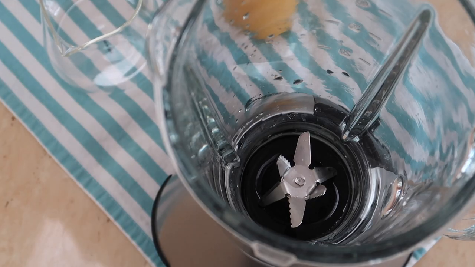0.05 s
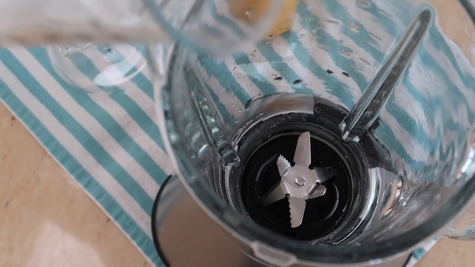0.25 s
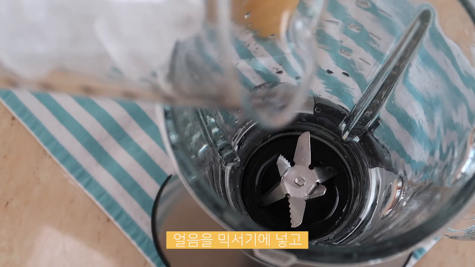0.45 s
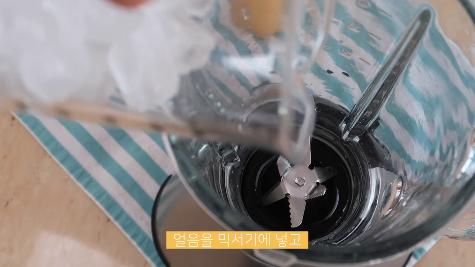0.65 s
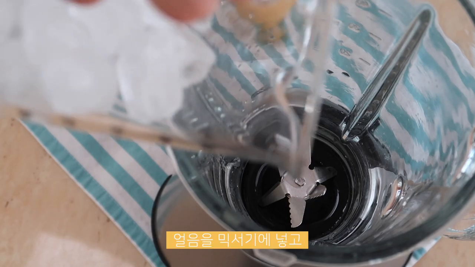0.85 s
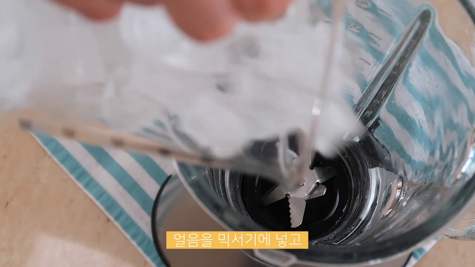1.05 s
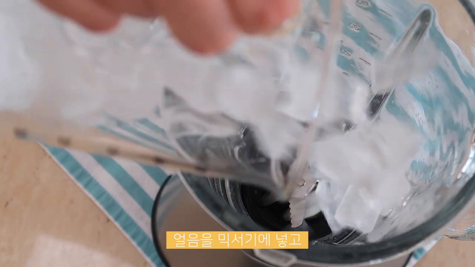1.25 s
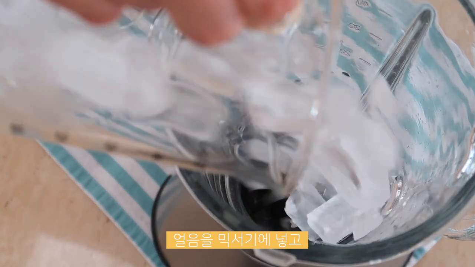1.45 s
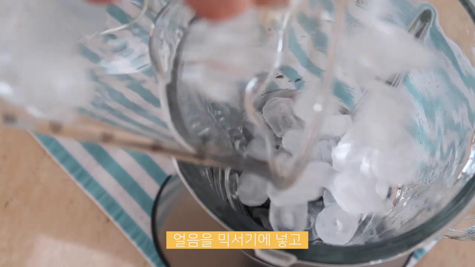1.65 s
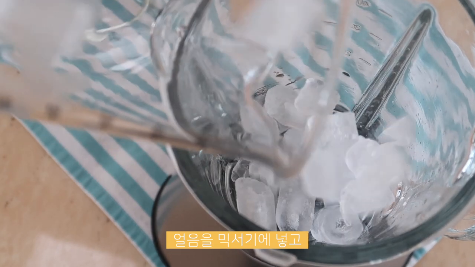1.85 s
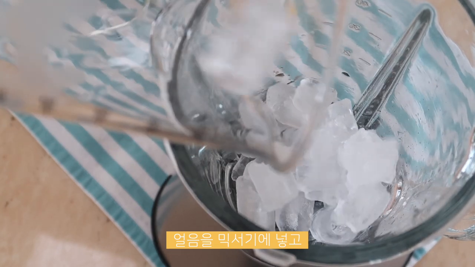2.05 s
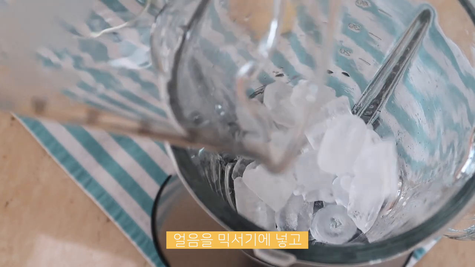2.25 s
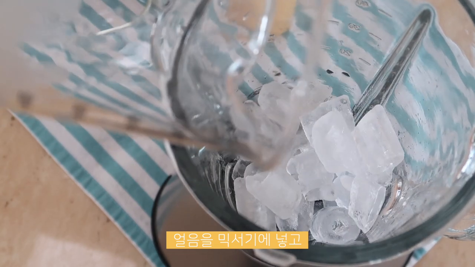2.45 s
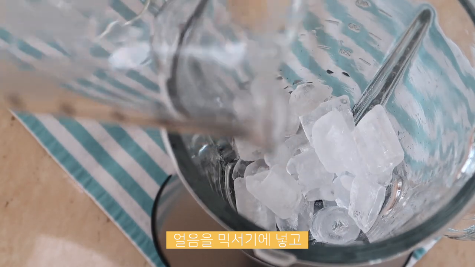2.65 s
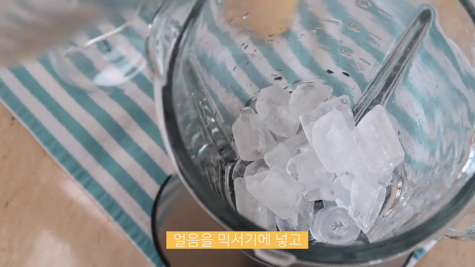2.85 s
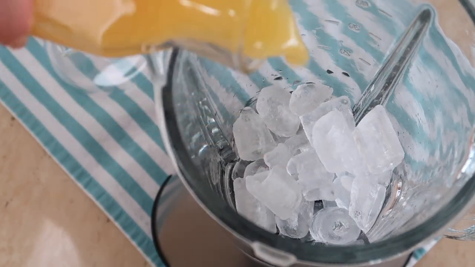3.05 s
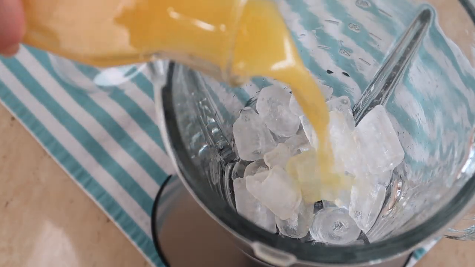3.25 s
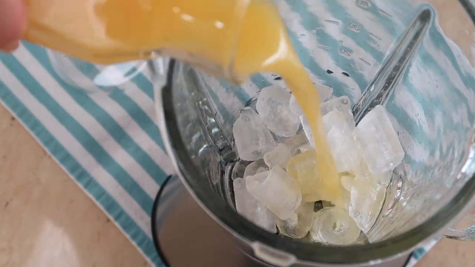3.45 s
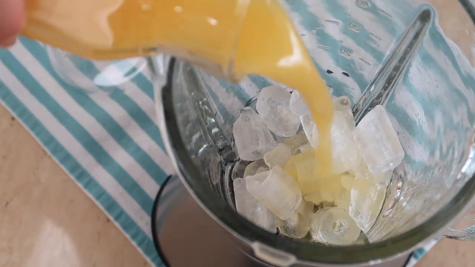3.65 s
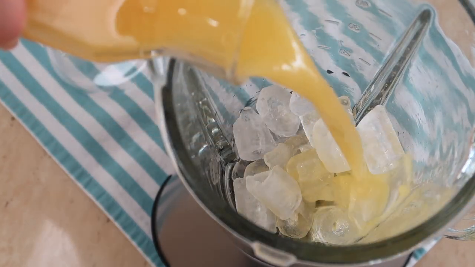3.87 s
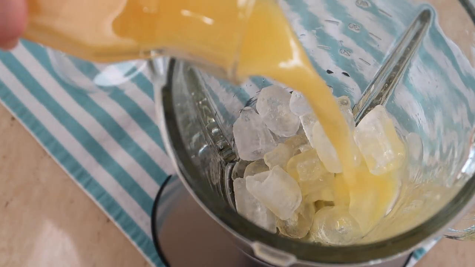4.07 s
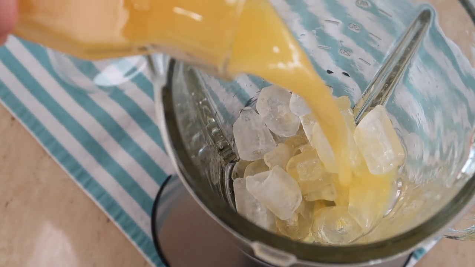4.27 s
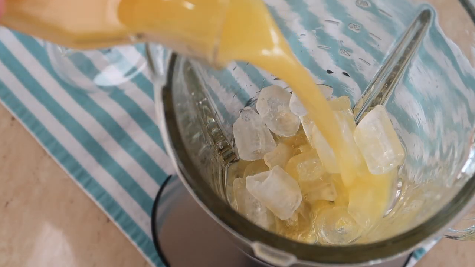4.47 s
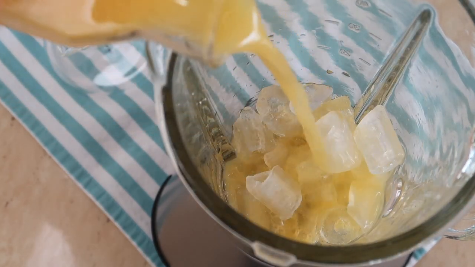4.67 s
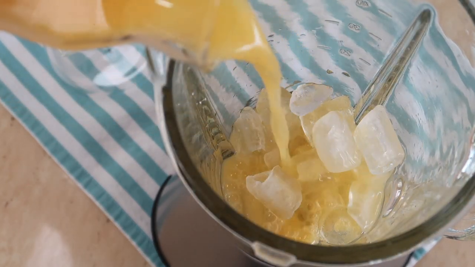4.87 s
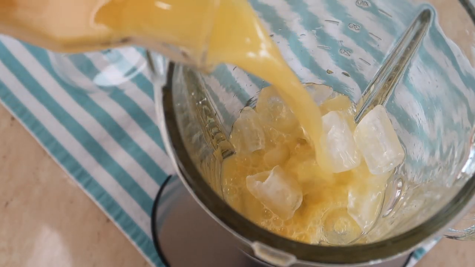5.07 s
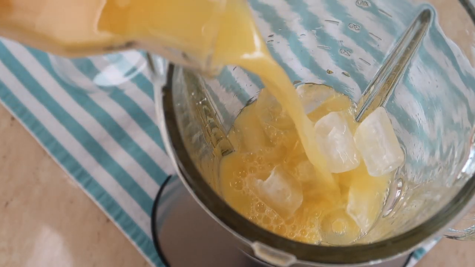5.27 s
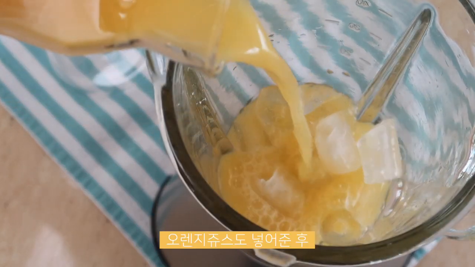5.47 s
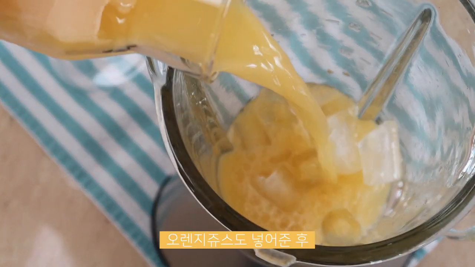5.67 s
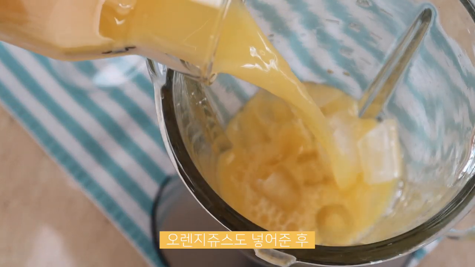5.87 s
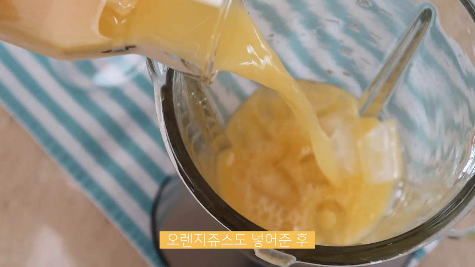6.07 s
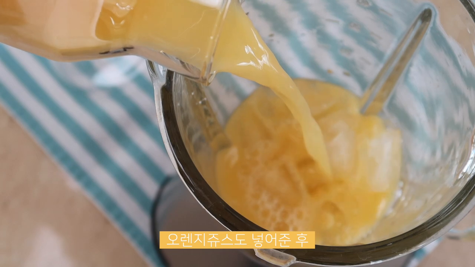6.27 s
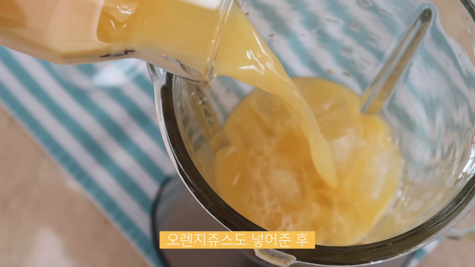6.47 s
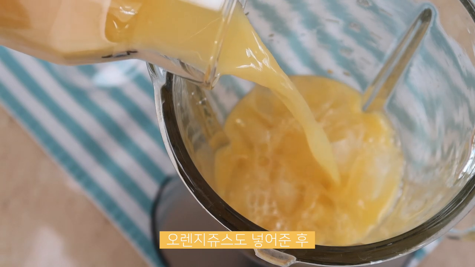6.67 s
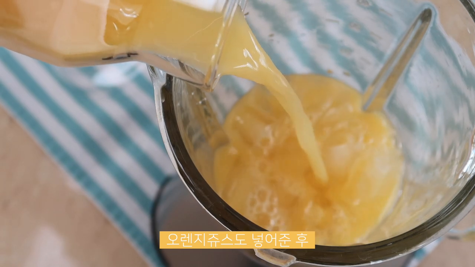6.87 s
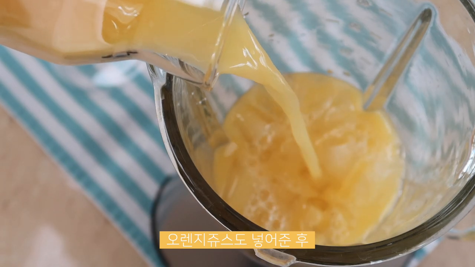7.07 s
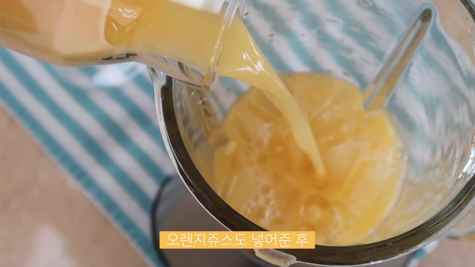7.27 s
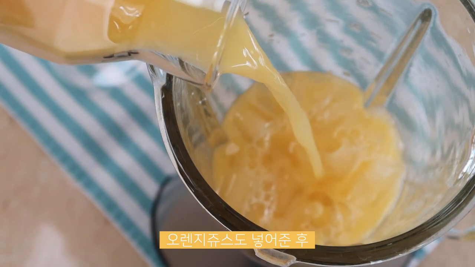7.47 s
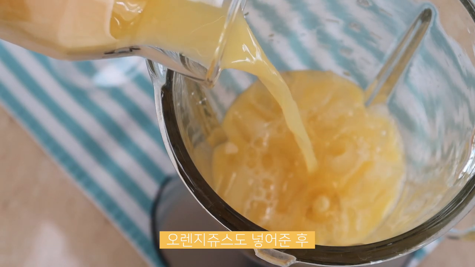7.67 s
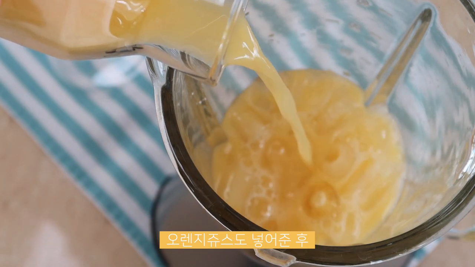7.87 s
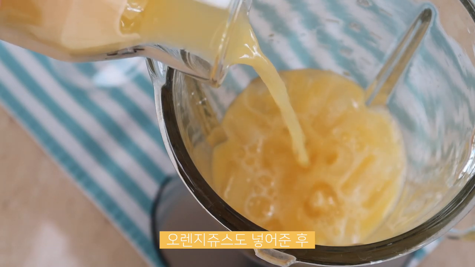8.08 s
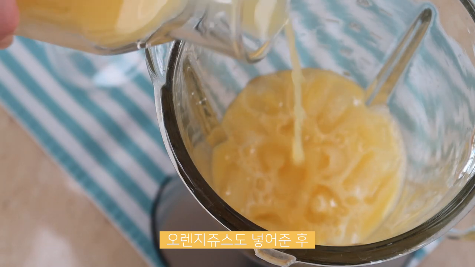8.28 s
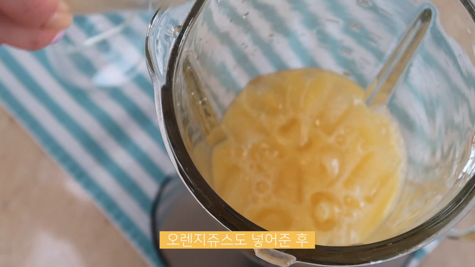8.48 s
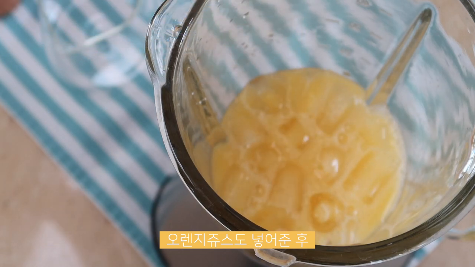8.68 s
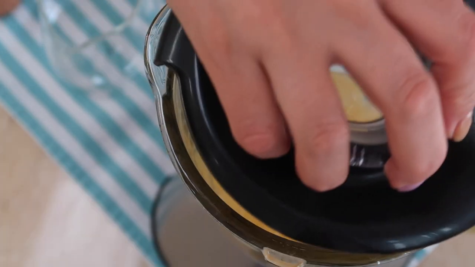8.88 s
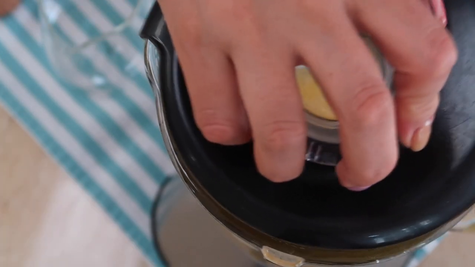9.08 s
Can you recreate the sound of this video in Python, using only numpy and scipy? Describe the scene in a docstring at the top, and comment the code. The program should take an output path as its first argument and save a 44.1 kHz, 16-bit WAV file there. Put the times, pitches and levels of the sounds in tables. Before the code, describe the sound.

Close up in a quiet, faintly humming kitchen, ice cubes shift with a few clicks in a tub, then tumble noisily into a glass jug, which rings dully. After a short lull, juice pours over the ice with bubbling, plinks and spatter, gradually softening. The bottle gurgles as it is tipped back, then a hollow plastic lid knocks onto the rim with a brief rasp.

```python
"""A small kitchen hums quietly while ice cubes slide out of a tub and tumble into a glass blender jug.
The jug rings like a dull bell: each mode of the glass is a dying sine. After a faint low hum, juice is poured,
with a dull knock on the jug as pouring starts and later a slump of ice. Many short rising tones make its bubbles,
noisy grains its spatter. The bottle gurgles in short hollow notes as it is tipped back.
Last, a plastic lid is knocked on as a set of short sines, and its seal rasps and groans along the rim."""
import sys
import numpy as np
from scipy import signal
from scipy.fft import rfft, irfft
from scipy.io import wavfile
from scipy.ndimage import uniform_filter1d

SR = 44100
rng = np.random.default_rng(int(sys.argv[2]) if len(sys.argv) > 2 else 0)


def wrap_up_sound(samples):
    """Save the sound to the file named by the first command line argument, as 16-bit audio."""
    columns = np.atleast_2d(samples).T
    # keep every value between -1 and 1, then stretch to whole-number steps
    tamed = np.clip(columns, -1, 1)
    steps = np.round(tamed * 32767).astype(np.int16)
    wavfile.write(sys.argv[1], SR, steps)


N = 402633  # length in samples

# All levels in the tables are relative: the functions weigh and mix them further.
# Colour of the room's air noise: pitch_hz, level_db_per_hz
ROOM_TONE = [(15, -35), (25, -16), (87, -8), (123, -14.5), (242, -11.5), (301, -15), (326, -25.5),
             (384, -15.5), (416, -24), (476, -15.5), (516, -18.5), (714, -20.5), (1330, -27.5),
             (10100, -49.5), (16000, -63.5)]
ROOM_DB = -56.5
# Hum of an appliance: pitch_hz, level_db, unsteadiness_per_s (two random phase points for each)
HUM = [(38.8, -63.5, 3.6), (82.2, -57.5, 5.1)]
# Colour of the air noise that differs between the ears: pitch_hz, level_db_per_hz
WIDTH_TONE = [(35, -58.5), (60, -28.5), (186, -1.5), (458, 0), (539, -6.5), (4020, -15), (4730, -18.5),
              (13700, -36.5), (15000, -44.5)]

# Cubes rumbling in the tub, shaken once and then tipped: time_s, rumble_db, note_db
TUMBLE = [(0.0, -60, -72), (0.08, -61, -55.5), (0.22, -46.5, -51), (0.245, -61, -47), (0.37, -55, -48),
          (0.48, -68, -71), (0.8, -73, -71), (0.87, -55, -58), (1.15, -50.5, -51), (1.3, -48, -57)]
# Colour of the tub's rumble: pitch_hz, level_db_per_hz
TUB = [(520, -9.5), (700, 0), (850, 1), (1200, -14), (1550, 0.5)]
TUB_HZ, TUB_T60, TUB_DB = 691, 0.15, -2  # the tub's hollow note; T60 is the time (s) to die by 60 dB

# How hard the heap of cubes is moving: time_s, level_db
HEAP = [(0.0, -68), (0.11, -69), (0.2, -54), (0.38, -50.5), (0.52, -73), (0.83, -66.5), (0.88, -52),
        (0.98, -41), (1.1, -34), (1.19, -38), (1.27, -24), (1.35, -32), (1.46, -29), (1.8, -31),
        (1.97, -37.5), (2.22, -47.5), (2.33, -38.5), (2.45, -53), (2.64, -74)]
# Colour of cubes jostling: pitch_hz, level_db_per_hz
ICE = [(1050, -1.5), (1400, -12.5), (1900, 2), (2300, -1.5), (2850, 4.5), (3400, -11.5), (4100, -9.5),
       (4900, -3.5), (5700, -18.5), (7000, -26.5)]
# Colour of knocks on the jug's base: pitch_hz, level_db_per_hz
BASE = [(250, -22), (350, -21.5), (430, -3.5), (560, -2.5), (700, -11), (850, -2.5), (1000, 11)]
# Colour of the ice splinters: pitch_hz, level_db_per_hz
GRIT = [(3240, -9), (5500, 1), (6400, -7.5), (6790, -8), (9740, -7.5), (10800, -13), (12700, -8),
        (16000, -39)]
GRIT_CYCLES = 180  # cycles for a splinter's ring to die by 60 dB
GRIT_DB, GRIT_AT_DB, GRIT_GROWTH = -37, -29, 1.37  # grit at this heap level; dB gained per dB of motion
SURGES_PER_S, SURGE_DB = 35, 2  # the heap slips and sticks
LANDING_S, LANDING_TAKES_S = 1.225, 0.099  # the heap begins to drop onto the glass
KNOCK_DB, SHIMMER_DB = -8, -5.5  # base and wall of the jug, relative to the landed heap

# Loudest clacks of cube on cube: start_s, level_db, pitch_hz, brittleness_db
CLACKS = [(0.131, -32, 1550, -12), (0.164, -25, 1980, 8), (0.169, -15.5, 2800, -7), (0.1955, -27, 2780, -1),
          (0.2304, -30.5, 3000, 14), (0.2425, -18, 2720, 4), (0.3476, -23, 2340, -2),
          (0.3556, -20, 2070, -6.5), (0.6855, -33.5, 2260, -18), (0.9073, -32, 2760, -6),
          (0.9477, -24.5, 2770, 9), (0.956, -26, 2400, 3.5), (0.9901, -24.5, 2760, -0.5),
          (1.0056, -28, 2920, -2), (1.0245, -22, 1990, 1), (1.0465, -17.5, 2750, -1),
          (1.0794, -19, 2900, 0), (1.0959, -18.5, 2750, 1.5), (1.1045, -17, 4960, 3),
          (1.1172, -20, 2080, 0.5), (1.1533, -22, 2790, 0), (1.1868, -18.5, 2980, -6),
          (1.2657, -2, 2290, -3), (1.2832, -11.5, 4900, -0.5), (1.291, -15.5, 4900, 9),
          (1.3085, -9.5, 2930, -1), (1.3163, -2, 2610, -10), (1.3227, -8, 1810, -5.5),
          (1.364, -12.5, 1800, 0.5), (1.4366, -12, 2800, -2.5), (1.5149, -17, 2530, 0.5),
          (1.5591, -1, 2740, -1.5), (1.5907, -13, 2100, 1.5), (1.601, -15.5, 2930, -3),
          (1.7288, -10, 4750, 9.5), (1.814, -12.5, 3210, -3), (1.9122, -8.5, 4960, 0.5),
          (1.933, -9, 2820, 5), (2.0238, -27, 2270, -2), (2.0947, -11, 2350, 6.5), (2.142, -10, 2820, -8),
          (2.2303, -38.5, 2480, -2), (2.3025, -8, 2564, 5), (2.4363, -30, 3910, -4)]
# Modes of a cube: multiple_of_pitch, level_db
CUBE = [(1, 0), (.8, -13.5), (1.37, -14), (1.72, -16.5)]

# Ice or bottle striking the jug:
# start_s, level_db, height (base 0 to wall 1), bell_db, longest_ring_s, favoured_hz
STRIKES = [(1.206, -32, 0.82, -27.5, 0.46, 2760), (1.238, -22.5, 0.77, -27, 0.38, 2500),
           (1.247, -24.5, 0.73, -20, 0.25, 3620), (1.266, -17.5, 0.37, -36, 0.18, 2300),
           (1.322, -31.5, 0.06, -28.5, 0.82, 420), (1.403, -27.5, 0.27, -27, 1, 4620),
           (1.452, -28, 0.42, -30, 0.34, 4720), (1.560, -34.5, 1, -42, 0.37, 2770),
           (1.648, -32.5, 0.93, -24, 0.16, 4720), (1.712, -28.5, 0.91, -31, 0.16, 4750),
           (1.77, -33, 1, -27.5, 1, 5030), (1.912, -34, 1, -25.5, 0.72, 5080),
           (2.057, -29.5, 0.81, -43, 0.51, 4820), (2.096, -27.5, 0.12, -20, 0.076, 3400),
           (2.255, -31.5, 0.78, -23, 0.51, 2490), (2.301, -31, 0.56, -26.5, 1, 3560),
           (3.252, -33, 0.017, -27.5, 0.29, 3556), (3.97, -30, 0.14, -29, 0.19, 2490)]
# Modes of the jug above or below its bell note: pitch_hz, level_db, t60_s
JUG = [(335, -10, .16), (421, 0, .22), (445, -5, .22), (490, -5, .27), (533, -9, .14), (829, -10, .15),
       (1023, -7, .36), (1115, -12, .25), (1206, -7, .09), (1325, -12, .2), (1544, -7, .25),
       (1809, -6, .35), (1955, -3, .36), (2299, -4, .38), (2494, 0, .3), (2697, -9, .38), (2760, -6, .14),
       (2900, -6, .24), (3079, -8, .36), (3310, -11, .2), (3560, -2, .1), (3608, -3, .16), (4355, -12, .25),
       (4619, -6, .2), (4722, -5, .3), (4872, -4, .22), (5030, -2, .14), (5609, -13, .22), (7009, -14, .28),
       (7624, -18, .28), (9600, -22, .12)]
# Centres of the hollow, bell, wall, clink and chink registers: pitch_hz
JUG_REGISTERS_HZ = [450, 967, 2700, 3600, 4400]
# Answer of each register to a strike on the base: level_db
BASE_REGISTERS_DB = [6.5, -3.5, -16, -1.5, -31]
# Answer of each register to a strike high on the wall: level_db
WALL_REGISTERS_DB = [-22.5, 0.5, -3, 1, 8]
FAVOUR_DB, FAVOUR_WIDTH_HZ = 8, 39  # modes near the favoured pitch ring out above the rest
BELL_HZ, BELL_DB = 967, 0.4
BELL_WANDER_RAD, BELL_WANDER_PER_S = .45, 11
THUD_S, THUD_DB, THUD_HZ, THUD_T60 = 1.41, -29, 264, 0.18  # the ice settles on the jug's floor

# A faint low hum: time_s, level_db
LOW_HUM = [(2.45, -73), (2.7, -64.5), (2.98, -59.5), (3.06, -76)]
LOW_HUM_HZ = 148

# Strength of the stream and of its froth: time_s, stream_db, froth_db
POUR = [(3.25, -58, -72), (3.38, -61, -54), (3.48, -56, -70), (3.72, -61, -67), (4.049, -50.5, -60),
        (4.36, -52.5, -68), (4.55, -54.5, -60.5), (4.78, -56, -60.5), (5.0, -56, -58), (5.35, -53.5, -62),
        (5.66, -59.5, -68), (5.9, -54, -65), (6.15, -61, -62), (6.5, -56, -66.5), (6.75, -62, -67.5),
        (7.05, -63.5, -68.5), (7.3, -61, -66), (7.55, -58.5, -66.5), (7.97, -58.5, -66), (8.3, -54.5, -64),
        (8.45, -53, -65), (8.56, -59, -77), (8.7, -73, -87)]
GUSH_PER_S, GUSH_DB = 45, 4  # unevenness of the stream
# Colour of the big bubbles: pitch_hz, level_db_per_hz
BIG_BUBBLES = [(220, -17), (330, -18.5), (490, 13), (620, -30), (780, -3), (1000, -8)]
# Colour of the middling bubbles: pitch_hz, level_db_per_hz
MID_BUBBLES = [(1000, -17), (1300, -3), (1800, -3), (2300, 2.5), (3000, 1)]
# Colour of the small bubbles: pitch_hz, level_db_per_hz
SMALL_BUBBLES = [(2800, 3.5), (3500, 3.5), (4400, -1), (5400, -8.5), (6800, -28.5)]
# Colour of the fine spray: pitch_hz, level_db_per_hz
SPRAY = [(3240, -23), (5500, -1), (8190, -10.5), (9610, -6), (11100, -11), (13100, -6.5), (14400, -19),
         (16000, -26)]
# Colour of juice churning in a splash: pitch_hz, level_db_per_hz
SLOSH = [(280, -20), (450, 1), (560, -0.5), (850, -15), (1100, -14), (1600, -3), (2000, -8)]
# The stream slaps onto ice: time_of_height_s, length_s, churn_db, spray_db
SPLASHES = [(3.266, 0.026, -63, -58.5), (3.414, 0.072, -52, -64.5), (3.577, 0.085, -57.5, -63.5),
            (3.822, 0.12, -51, -62.5), (4.158, 0.079, -44, -79), (4.685, 0.063, -57, -64),
            (4.902, 0.07, -55, -55.5), (5.06, 0.061, -53.5, -62.5), (5.393, 0.084, -56, -65),
            (5.478, 0.096, -56, -63), (5.808, 0.055, -48.5, -71), (6.374, 0.097, -51, -85),
            (6.536, 0.096, -64, -95), (7.123, 0.047, -73, -72), (7.882, 0.072, -53.5, -67.5),
            (8.032, 0.028, -58, -66), (8.195, 0.073, -45.5, -71), (8.41, 0.11, -63, -65)]
STREAM_BIG_DB, STREAM_SPRAY_DB = -2.5, -21  # share of big bubbles and spray in the stream
SPLASH_BIG_DB, SPLASH_SMALL_DB = -7, -6.5  # share of big and small bubbles in a splash
# Small slops in the stream; the span is the ratio of highest to lowest bubble
SLOPS_PER_S, SLOP_SPREAD_DB, SLOP_S = 55, 4.5, .016
SLOP_LOWEST_FROM_HZ, SLOP_LOWEST_TO_HZ, SLOP_SPAN = 756, 1890, 2.176
SLOP_FADE_DB = 9.5  # the last bubble of any slop is weaker by this
# Loudest slops of juice: start_s, level_db, lowest_bubble_hz, highest_bubble_hz, length_s
SLOPS = [(3.567, -33, 1010, 3000, 0.037), (3.817, -28, 1880, 3270, 0.033), (3.877, -34, 1090, 2800, 0.014),
         (4.07, -29, 1180, 3120, .008), (4.099, -31.5, 1090, 2880, 0.009), (4.16, -32, 1300, 3200, 0.018),
         (4.194, -29.5, 1120, 2770, .03), (4.332, -35, 1200, 3300, .01), (4.367, -37.5, 750, 1900, 0.0051),
         (4.453, -47, 1300, 2700, .005), (4.552, -39, 900, 2500, 0.0065), (4.721, -44, 1100, 2800, 0.0079),
         (4.884, -34.5, 1200, 2500, 0.0055), (4.954, -33, 1300, 4500, 0.0076),
         (5.022, -35, 3800, 6100, 0.012), (5.03, -37, 1600, 2800, 0.0088), (5.107, -40, 1900, 3500, .005),
         (5.254, -40, 1000, 2500, .008), (5.378, -41, 1100, 2000, .02), (5.414, -46, 920, 2300, .04),
         (5.799, -34.5, 1205, 2700, 0.023), (6.315, -37, 480, 2500, 0.013), (6.361, -41, 515, 2400, .012),
         (6.379, -35.5, 500, 3600, .012), (6.408, -43, 600, 1900, .012), (6.463, -41, 900, 2400, .008),
         (6.531, -41, 800, 2200, 0.0083), (6.558, -45, 810, 2500, 0.012), (6.828, -48.5, 600, 2000, .005),
         (7.542, -44, 1190, 3200, .02), (7.683, -31, 1380, 4800, 0.038), (7.777, -44, 1390, 2700, .008),
         (7.868, -36, 1180, 2290, 0.0073), (7.918, -39, 896, 3600, 0.0084),
         (8.021, -32.5, 730, 4030, 0.0046), (8.039, -38.5, 695, 3178, 0.0066), (8.07, -39, 1800, 4400, .02),
         (8.17, -35, 1500, 2700, .008), (8.198, -30, 1000, 4430, .012), (8.398, -35, 2210, 4180, 0.0098),
         (8.422, -44, 2600, 4200, .012), (8.441, -36, 1680, 4220, 0.0078), (8.465, -41.5, 2400, 4170, .008),
         (8.487, -41, 1890, 3900, 0.0094), (8.51, -39, 1690, 4270, 0.0069)]
# The air in the jug, which colours the pour: pitch_hz, level_db, t60_s
JUG_AIR = [(1333, -18.5, 0.09), (1525, -18.5, 0.067), (1760, -19.5, 0.06), (2246, -18, 0.052)]
# Short low hollow notes: start_s, level_db, pitch_hz
HOLLOW_NOTES = [(3.258, -29, 351), (3.671, -38.5, 447), (4.616, -37, 504), (4.661, -33, 493),
                (4.96, -32.5, 490), (5.375, -35, 356), (5.399, -34, 248), (5.439, -41, 264)]
# Single bubbles that ring out clearly: start_s, level_db, pitch_hz
PLINKS = [(3.3992, -34, 2610), (3.4132, -27, 2240), (3.4835, -38, 2220), (3.5004, -35, 2100),
          (3.7434, -40, 2249), (3.7743, -31, 2220), (3.8167, -27.5, 2580), (4.142, -23, 1640),
          (4.151, -20, 1910), (4.1559, -26, 1920), (4.3301, -38, 1310), (4.422, -38.5, 1310),
          (4.5516, -39, 2200), (4.585, -35, 2210), (4.6175, -32, 1290), (4.6588, -40, 2360),
          (4.815, -41, 2920), (4.8523, -18, 2510), (4.8665, -25, 2500), (4.9432, -31.5, 1770),
          (5.255, -35, 1430), (5.4645, -33, 1970), (5.7992, -39, 2250), (5.9404, -37.5, 2360),
          (5.9614, -27.5, 2610), (5.994, -34.5, 2250), (7.0958, -30.5, 2185), (7.1636, -40.5, 2290),
          (7.179, -43, 3300), (7.2389, -37.5, 2220), (7.241, -41.5, 3400), (8.1195, -33, 2660),
          (8.2976, -35.5, 2508), (8.3382, -26.5, 2080), (8.3425, -34, 2480), (8.3665, -34, 1930),
          (8.4403, -37.5, 2180), (8.5934, -43, 2620)]
# Short noisy slaps and knocks in the juice: start_s, level_db, pitch_hz, brightness_db
KNOCKS = [(3.919, -35, 1720, -4), (4.2103, -27, 2650, 5.5), (4.366, -36.5, 1701, 2),
          (5.5662, -37, 2680, 11), (5.6052, -36.5, 2350, 14), (7.8538, -32, 1800, -3),
          (8.1811, -26, 1100, 6), (8.1884, -24.5, 3490, -2)]

# The bottle's neck glugs as it is tipped back: start_s, level_db, pitch_hz
GLUGS = [(8.214, -36, 670), (8.248, -29, 580), (8.302, -39.5, 600), (8.318, -31.5, 548), (8.352, -37, 565),
         (8.397, -38, 562), (8.409, -26, 600), (8.429, -36, 540), (8.444, -37, 570), (8.465, -37.5, 560),
         (8.488, -29, 553), (8.511, -29.5, 583), (8.609, -42, 560)]

# The lid meets the rim, then is pressed home: start_s, level_db, hardness_hz (treble limit)
LID_KNOCKS = [(8.908, -22, 4200), (9.07, -46, 1200), (9.107, -49, 1500), (9.122, -42, 700)]
# Modes of the lid: pitch_hz, level_db, t60_s
LID = [(354, -22, 0.086), (415, -24, 0.23), (431, -1.5, 0.084), (697, -9.5, 0.038), (810, -9, 0.064),
       (1070, -14, 0.026), (1240, -28, .5), (1360, 5, 0.037), (1345, -30, 0.49), (1450, -2, 0.027),
       (1643, -16, .17), (1750, -27, .4), (2090, -11, .05), (2340, -16, .03), (2760, -24, .07),
       (3180, -20, .015), (3770, -18.5, 0.023), (6460, -28, .04)]
# The lid's seal drags along the rim: time_s, rasp_db, groan_db
SEAL_DRAG = [(8.91, -43, -61), (8.955, -61, -60), (9.01, -59, -64), (9.06, -64, -68), (9.08, -67, -43.5),
             (9.097, -68, -63), (9.13, -56, -42.5)]
# Colour of the seal's rasp: pitch_hz, level_db_per_hz
RASP = [(1150, -12), (1350, -5.5), (1520, -4.5), (1750, 0), (2050, -14), (3100, -18.5)]
# Colour of the seal's groan: pitch_hz, level_db_per_hz
GROAN = [(300, 3.5), (370, 7), (450, -14.5), (800, -12.5)]

# Time for the kitchen's echo to die by 60 dB: pitch_hz, t60_s
ROOM_T60 = [(300, 0.39), (800, 0.3), (2100, 0.15), (5500, 0.28), (15000, 0.15)]
# How much the two ears differ: pitch_hz, level_db
EAR_SPREAD = [(60, -33.5), (700, -41), (1300, -71.5), (2400, -27), (4400, -4.5), (8100, 2.5), (15000, 0)]
CUTOFF_HZ = 15200  # top of the finished sound


def from_db(db):
    """Turn decibels into gain."""
    return 10 ** (np.asarray(db) / 20)


def rms_one(x):
    """Scale to an rms (average strength) of 1."""
    return x / np.sqrt(np.mean(x ** 2) + 1e-20)


def clock():
    """Time of every sample, in seconds."""
    return np.arange(N) / SR


def gains_in_time(rows):
    """One gain curve for each dB column, practically silent outside the rows."""
    times, *columns = np.transpose(rows)
    return [from_db(np.interp(clock(), times, levels, left=-120, right=-120)) for levels in columns]


def at_hz(points, hz):
    """Read a table between its rows, with pitch on a logarithmic axis."""
    table_hz, value = np.transpose(points)
    return np.interp(np.log(hz + 1e-9), np.log(table_hz), value)


def cut(x, hz, kind, order=2):
    """Keep only the low, high or middle band with a Butterworth filter."""
    sections = signal.butter(order, np.minimum(hz, .45 * SR), kind, fs=SR, output="sos")
    return signal.sosfilt(sections, x + 1e-18)


def add(track, start_s, sound):
    """Mix a sound into a track at a given time."""
    i = min(max(int(start_s * SR), 0), N)
    track[i:i + len(sound)] += sound[:N - i]


def ping(hz, t60, length, rise=0):
    """A dying sine, whose pitch climbs by the share rise in one t60."""
    t = np.arange(int(length * SR) + 2) / SR
    return from_db(-60 * t / t60) * np.sin(2 * np.pi * hz * t * (1 + rise * t / t60 / 2))


def puff(t60, length):
    """A dying burst of noise."""
    t = np.arange(int(length * SR) + 2) / SR
    return from_db(-60 * t / t60) * rng.standard_normal(len(t))


def swell(sound, attack):
    """Vibration takes a moment (s) to build up."""
    return sound * (1 - np.exp(-np.arange(len(sound)) / (abs(attack) * SR + 1)))


def wavering(per_s):
    """Slow chance: straight lines between random values of about unit spread."""
    knots = np.arange(0, N / SR + 1, 1 / per_s)
    return np.interp(clock(), knots, rng.standard_normal(len(knots)))


def evened(x, window):
    """Hold a stream of grains near unit rms over the window (s), keeping its fine spikes."""
    size = int(window * SR)
    power = uniform_filter1d(uniform_filter1d(x ** 2, size), size)
    return x / np.sqrt(np.abs(power) + 1e-3 * np.mean(x ** 2))


def chance_moments(per_s):
    """Random sample positions, so many per second on average."""
    return np.flatnonzero(rng.random(N) < per_s / SR)


def resonate(at, sizes, hz, t60):
    """Clicks at the given samples ring one resonance; rms 1."""
    clicks = np.full(N, 1e-18)
    clicks[at] = sizes
    radius, angle = from_db(-60 / t60 / SR), 2 * np.pi * hz / SR
    feedback = [1, -2 * radius * np.cos(angle), radius * radius]
    return rms_one(signal.lfilter([1, 0, -1], feedback, clicks))


def coloured_air(colour):
    """Noise shaped to a table of levels over pitch; rms 1."""
    gain = from_db(at_hz(colour, np.arange(N // 2 + 1) * SR / N))
    return rms_one(irfft(rfft(rng.standard_normal(N)) * gain, N))


def rattle(spectrum, per_s, spread_db, cycles, count):
    """Random contacts, each sharing itself out unevenly among many short resonances."""
    at = chance_moments(per_s)
    sizes = from_db(spread_db * np.minimum(rng.exponential(1, N), 4))[at]
    out = np.zeros(N)
    for hz in np.geomspace(spectrum[0][0], min(spectrum[-1][0], CUTOFF_HZ), count):
        share = rng.standard_normal(len(at))
        ring = resonate(at, sizes * share * np.abs(share), hz, cycles / hz)
        out += from_db(at_hz(spectrum, hz)) * np.sqrt(hz) * ring
    return evened(out, window=0.085)


def room_tone():
    """Soft air noise and low sines whose wandering phase makes them unsteady."""
    out = from_db(ROOM_DB) * cut(coloured_air(ROOM_TONE), 32, "high", order=4)
    for hz, level_db, per_s in HUM:
        phase = 2 * np.pi * hz * clock() + 0.77 * wavering(2 * per_s)
        out = out + from_db(level_db) * np.sqrt(2) * np.sin(phase)
    return out


def room_width(level_db):
    """Faint air noise, of opposite sign in the two ears."""
    return from_db(level_db) * coloured_air(WIDTH_TONE) * np.array([[1], [-1]])


def tub():
    """Rolling cubes keep the tub's one hollow note ringing, over a dull rumble."""
    at = chance_moments(300)
    note = evened(resonate(at, rng.standard_normal(len(at)), TUB_HZ, TUB_T60), window=0.07)
    rumble, ring = gains_in_time(TUMBLE)
    rolling = rattle(TUB, per_s=700, spread_db=2.5, cycles=29, count=14)
    return ring * from_db(TUB_DB) * note + rumble * rolling


def landed_motion():
    """The heap's motion reaches the jug only once cubes lie in it."""
    return gains_in_time(HEAP)[0] * np.clip((clock() - LANDING_S) / LANDING_TAKES_S, 0, 1)


def heap():
    """Cubes jostle one another, knock on the jug's base and grind off grit."""
    motion = gains_in_time(HEAP)[0] * from_db(SURGE_DB * (wavering(SURGES_PER_S) - 0.18))
    grit = from_db(GRIT_DB) * (motion / from_db(GRIT_AT_DB)) ** GRIT_GROWTH
    out = motion * from_db(-2.5) * rattle(ICE, per_s=150, spread_db=2.0, cycles=130, count=48)
    base_knocks = rattle(BASE, per_s=160, spread_db=7.0, cycles=19, count=14)
    out += landed_motion() * from_db(KNOCK_DB) * base_knocks
    out += motion * from_db(-15.5) * rattle(BASE, per_s=160, spread_db=3.5, cycles=17, count=14)
    return out + grit * rattle(GRIT, per_s=410, spread_db=2.5, cycles=GRIT_CYCLES, count=56)


def contacts(rows, ring_t60, ring_db, burst_db, body_db, snap_db, burst_t60, rise, attack, modes):
    """Each contact is a brief pitched ring with a woody body, a noise burst and a snap; some are brighter."""
    out, length = np.zeros(N), .05
    for start_s, level_db, hz, *brittle_db in rows:
        bright_db = sum(brittle_db)  # 0 where the table has no such column
        tones = sum(from_db(db) * ping(hz * k, ring_t60, length, rise) for k, db in modes)
        ring = from_db(ring_db) * swell(tones, attack)
        burst = cut(puff(burst_t60, length), [1900, 5200], "band", order=4)
        body = cut(puff(burst_t60 * 2, length), [850, 2000], "band")
        snap = cut(puff(burst_t60, length), 4000, "high", order=3)
        noise = from_db(burst_db + bright_db / 2) * burst + from_db(body_db) * body
        noise += from_db(snap_db + bright_db) * snap
        add(out, start_s, from_db(level_db) * (ring + swell(noise, attack / 2)))
    return out


def clacks():
    """Cube hits cube: a very short ring of several modes with a strong noise burst."""
    return contacts(CLACKS, ring_t60=0.012, ring_db=1.0, burst_db=-1.5, body_db=-4.0, snap_db=-18.5,
                    burst_t60=0.015, rise=0, attack=0.00081, modes=CUBE)


def registers(strike_db, height):
    """Level of each register: hollow for a strike on the base, bright for one on the wall."""
    return strike_db + (1 - height) * np.array(BASE_REGISTERS_DB) + height * np.array(WALL_REGISTERS_DB)


def jug(scatter_db, thud_db, thud_t60, attack):
    """Height and spot of a strike decide which modes speak; ice and juice on the glass shorten the ring."""
    out = np.zeros(N)
    for start_s, strike_db, height, bell_db, longest, favoured_hz in STRIKES:
        register_db = registers(strike_db, height)
        for hz, level_db, t60 in JUG:
            strength_db = level_db + np.interp(np.log(hz), np.log(JUG_REGISTERS_HZ), register_db)
            strength_db += FAVOUR_DB / (1 + ((hz - favoured_hz) / FAVOUR_WIDTH_HZ) ** 2)
            luck = 1
            if hz > 1200:
                luck = from_db(scatter_db * rng.normal()) * rng.choice([-1, 1])
            decay = min(t60, longest)
            loading = 1 + 0.0011 * rng.normal()  # touching ice detunes the glass a little
            mode = swell(ping(hz * loading, decay, decay), attack)
            add(out, start_s, luck * from_db(strength_db) * mode)
        thud = cut(puff(thud_t60, thud_t60), [320, 1900], "band", order=4)
        add(out, start_s, from_db(register_db[0] + thud_db) * thud)
    return cut(out, 380, "high")


def bell(attack):
    """Every strike feeds energy into the jug's bell mode, which sings on between them."""
    energy, t = np.zeros(N), np.arange(2 * SR) / SR
    for start_s, strike_db, height, bell_db, longest, favoured_hz in STRIKES:
        add(energy, start_s, swell(from_db(bell_db - 60 * t / longest), attack) ** 2)
    phase = 2 * np.pi * BELL_HZ * clock() + BELL_WANDER_RAD * wavering(BELL_WANDER_PER_S)
    return from_db(BELL_DB) * np.sqrt(energy) * np.sin(phase)


def taps(per_s, longest):
    """The shifting heap taps the glass, which rings on freely after each tap."""
    at = chance_moments(per_s)
    motion = landed_motion()
    rings = np.zeros(N)
    for hz, db, t60 in JUG:
        sizes = motion[at] * rng.standard_normal(len(at))
        rings += from_db(db) * resonate(at, sizes, hz, min(t60, longest))
    return from_db(SHIMMER_DB) * np.sqrt(np.mean(motion ** 2)) * rms_one(rings)


def settling():
    """One dull thud, a low dying sine, as the ice comes to rest on the floor of the jug."""
    out = np.zeros(N)
    add(out, THUD_S, from_db(THUD_DB) * swell(ping(THUD_HZ, THUD_T60, THUD_T60), attack=.004))
    return out


def low_hum():
    """A faint low sine swells and stops between the ice and the juice."""
    phase = 2 * np.pi * LOW_HUM_HZ * clock() + .5 * wavering(22)
    return gains_in_time(LOW_HUM)[0] * np.sqrt(2) * np.sin(phase)


def bubbles(spectrum, count, spread_db, cycles, rise, build_cycles):
    """Bubbles are born at random during the pour; each rings at its own pitch and rises as it nears the surface."""
    out, low, high = np.zeros(N), spectrum[0][0], spectrum[-1][0]
    start, end = POUR[0][0], POUR[-1][0]
    for when, size, strength, life in rng.random((count, 4)):
        hz = low * (high / low) ** size
        t60 = cycles * (.5 + life) / hz
        gain = hz * from_db(at_hz(spectrum, hz) - spread_db * np.log(strength + .02))
        add(out, start + when * (end - start), gain * swell(ping(hz, t60, t60, rise), build_cycles / hz))
    return evened(out, window=0.1)


def splashes():
    """Each splash swells and fades like a bell curve; gains of its churning and of its spray."""
    churn, spray = 0, 0
    for height_s, length, level_db, spray_db in SPLASHES:
        shape = np.exp(-2 * np.minimum(((clock() - height_s) / length) ** 2, 20))
        churn = churn + from_db(level_db) * shape
        spray = spray + from_db(spray_db) * shape
    return churn, spray


def slops(rows, count, cycles, rise):
    """A fold of juice bursts into a cluster of short bubbles; most come early, the late ones are weaker."""
    out = np.zeros(N)
    for start_s, level_db, low_hz, high_hz, length in rows:
        for k, (size, late, life, sign) in enumerate(rng.random((count, 4))):
            hz = low_hz * (high_hz / low_hz) ** ((k + size) / count)
            t60 = cycles * (.5 + life) / hz
            gain = np.sign(sign - .5) * from_db(level_db - SLOP_FADE_DB * late)
            add(out, start_s + length * late ** 2, gain * swell(ping(hz, t60, t60, rise), 1 / hz))
    return out


def gurgle():
    """The stream keeps folding over in small slops of random size; held near rms 1."""
    start, end = POUR[0][0], POUR[-1][0]
    when, size, strength = rng.random((3, int(SLOPS_PER_S * (end - start))))
    low_hz = SLOP_LOWEST_FROM_HZ * (SLOP_LOWEST_TO_HZ / SLOP_LOWEST_FROM_HZ) ** size
    rows = [(start + w * (end - start), SLOP_SPREAD_DB * 2 * a, hz, hz * SLOP_SPAN, SLOP_S)
            for w, a, hz in zip(when, strength, low_hz)]
    return evened(slops(rows, count=8, cycles=18, rise=0.05), window=0.14)


def pour():
    """The stream comes in gushes: it folds air into the juice, slaps on the ice, froths and throws fine spray."""
    gush = from_db(GUSH_DB * (wavering(GUSH_PER_S) - 0.5))
    stream, froth = gains_in_time(POUR)
    splash, thrown = splashes()
    middling = np.hypot(stream, splash)  # hypot adds the two as powers
    big = np.hypot(stream * from_db(STREAM_BIG_DB), splash * from_db(SPLASH_BIG_DB))
    small = np.hypot(froth, splash * from_db(SPLASH_SMALL_DB))
    spray = np.hypot(stream * from_db(STREAM_SPRAY_DB), thrown)

    big_ones = bubbles(BIG_BUBBLES, count=900, spread_db=5.5, cycles=15, rise=0.5, build_cycles=0.77)
    mid_ones = bubbles(MID_BUBBLES, count=2400, spread_db=4.0, cycles=22, rise=0.07, build_cycles=1.5)
    small_ones = bubbles(SMALL_BUBBLES, count=3000, spread_db=4.5, cycles=34, rise=0.098, build_cycles=2.2)
    fine_ones = bubbles(SPRAY, count=7000, spread_db=4.0, cycles=96, rise=0.026, build_cycles=.3)
    churning = rattle(SLOSH, per_s=900, spread_db=2.0, cycles=9.9, count=16)
    spatter = rattle(SMALL_BUBBLES, per_s=150, spread_db=2.5, cycles=26, count=12)

    out = big * from_db(-1.0) * big_ones + middling * from_db(-3.0) * mid_ones
    out += splash * from_db(-9.0) * churning + middling * from_db(-3.5) * gurgle()
    out += small * from_db(-1.5) * small_ones + (small + spray) * from_db(-5.0) * spatter
    return gush * (out + spray * from_db(2.5) * fine_ones)


def jug_air(x):
    """Sound made inside the jug sets its air ringing."""
    rings = sum(from_db(db) * resonate(np.arange(N), x, hz, t60) for hz, db, t60 in JUG_AIR)
    return x + np.std(x) * rings


def hollow_notes(t60, rise, level_db):
    """Short low hollow notes: dying sines that rise slightly."""
    out = np.zeros(N)
    for start_s, note_db, hz in HOLLOW_NOTES:
        add(out, start_s, from_db(note_db + level_db) * swell(ping(hz, t60, t60, rise), attack=0.002))
    return cut(out, [190, 1200], "band")


def plinks():
    """A single bubble rings clearly and rises in pitch, with little noise."""
    return contacts(PLINKS, ring_t60=0.015, ring_db=4.0, burst_db=-12.5, body_db=-19.0, snap_db=-42.0,
                    burst_t60=0.022, rise=0.14, attack=0.00091, modes=CUBE[:1])


def knocks():
    """Short noisy slaps and knocks in the juice: one steady note with a strong burst of noise."""
    return contacts(KNOCKS, ring_t60=0.013, ring_db=6.0, burst_db=2.5, body_db=2.0, snap_db=-22.0,
                    burst_t60=0.013, rise=0, attack=0.0018, modes=CUBE[:1])


def glugs():
    """Each gulp of air entering the bottle's neck is a short hollow note with a wet tick."""
    return contacts(GLUGS, ring_t60=0.037, ring_db=4.0, burst_db=-24, body_db=1, snap_db=-21,
                    burst_t60=0.012, rise=0.05, attack=0.003, modes=CUBE[:1])


def lid(burst_db, burst_t60):
    """Stiff plastic on glass: a hollow knock, duller when soft, while the seal sticks and slips on the rim."""
    out, length = np.zeros(N), .25
    for start_s, level_db, hard_hz in LID_KNOCKS:
        knock = from_db(burst_db) * puff(burst_t60, length)
        for k, (hz, db, t60) in enumerate(LID):
            knock += (-1) ** k * from_db(db) * ping(hz, t60, length)  # signs alternate
        add(out, start_s, from_db(level_db) * cut(knock, hard_hz, "low", order=4))
    rasp, groan = gains_in_time(SEAL_DRAG)
    out += rasp * rattle(RASP, per_s=1000, spread_db=1.0, cycles=53, count=16)
    return out + groan * rattle(GROAN, per_s=500, spread_db=-0.5, cycles=18, count=8)


def kitchen(x, wet_db):
    """Add a short diffuse echo tail that dies at its own speed in each band."""
    edges, tail, length = np.geomspace(150, 16000, 8), 0, .45
    for low, high in zip(edges, edges[1:]):
        t60 = at_hz(ROOM_T60, np.sqrt(low * high))
        tail = tail + cut(puff(t60, length), [low, high], "band")
    tail = tail * np.minimum(np.arange(len(tail)) / (0.0014 * SR), 1)
    return x + from_db(wet_db) * signal.fftconvolve(x, tail / np.linalg.norm(tail))[:N]


def two_ears(x, lag_db, far_db, far_t60):
    """Close microphones share the bass; short waves reach them out of step and by different reflections."""
    far = puff(far_t60, far_t60)
    reflected = signal.fftconvolve(x, far / np.linalg.norm(far))[:N]
    # 1j turns every wave by a quarter cycle
    difference = 1j * from_db(lag_db) * rfft(x) + from_db(far_db) * rfft(reflected)
    spread = from_db(at_hz(EAR_SPREAD, np.arange(N // 2 + 1) * SR / N))
    side = irfft(difference * spread, N)
    return np.array([x + side, x - side])


def gain_control(x, threshold_db, release_db_per_s, range_db):
    """Loud sound turns the gain down at once, within a limited range; it creeps back afterwards."""
    power = np.abs(uniform_filter1d(x.mean(axis=0) ** 2, size=1300))
    level_db = 10 * np.log10(power + 1e-12)
    recovery = release_db_per_s * clock()
    excess_db = np.clip(level_db - threshold_db, 0, range_db)
    return x * from_db(recovery - np.maximum.accumulate(excess_db + recovery))


def scene():
    """Ice, juice and lid, close by in the kitchen."""
    ice = heap() + clacks()
    glass = jug(scatter_db=2.0, thud_db=6, thud_t60=0.11, attack=0.0013)
    glass = glass + taps(per_s=150, longest=0.15) + settling()
    juice = jug_air(pour() + slops(SLOPS, count=11, cycles=20, rise=0.05))
    juice = juice + hollow_notes(t60=0.058, rise=0.026, level_db=-2.0)
    drops = plinks() + knocks()
    cover = lid(burst_db=-26, burst_t60=0.011)

    sound = room_tone() + tub() + bell(attack=0.018) + low_hum()  # these get no added echo
    sound += kitchen(ice, wet_db=-4) + kitchen(glass, wet_db=-13)
    sound += kitchen(juice, wet_db=-4.5) + kitchen(drops, wet_db=-5.5)
    sound += kitchen(glugs(), wet_db=-8) + kitchen(cover, wet_db=-11.0)
    return two_ears(sound, lag_db=-8.0, far_db=-5.0, far_t60=0.25) + room_width(level_db=-67.5)


def record(dry):
    """Automatic gain, then the top is cut steeply."""
    held = gain_control(dry, threshold_db=-23.5, release_db_per_s=4.0, range_db=10.5)
    steep = signal.ellip(10, .2, 80, CUTOFF_HZ, fs=SR, output="sos")
    return signal.sosfilt(steep, held)


dry = scene()
out = record(dry)
wrap_up_sound(out)
```